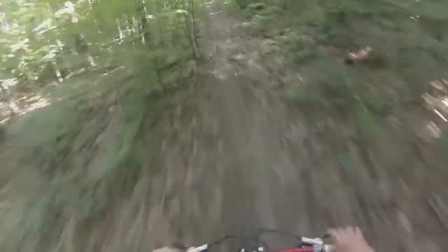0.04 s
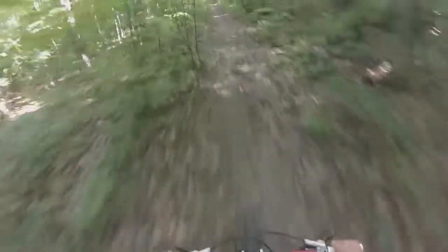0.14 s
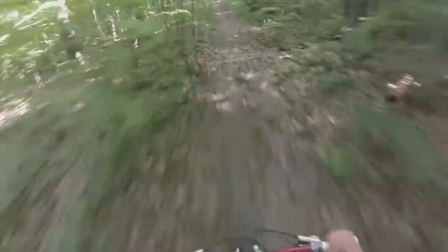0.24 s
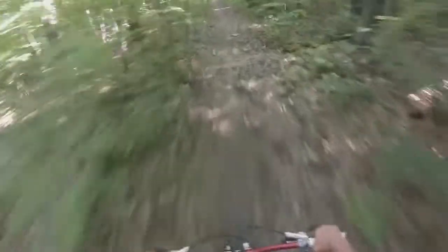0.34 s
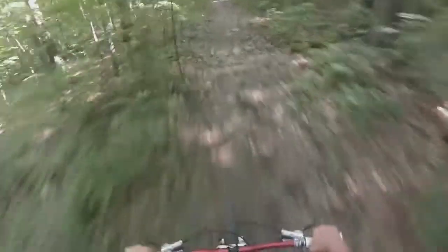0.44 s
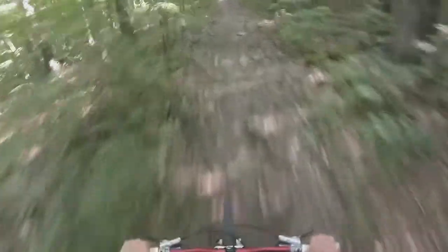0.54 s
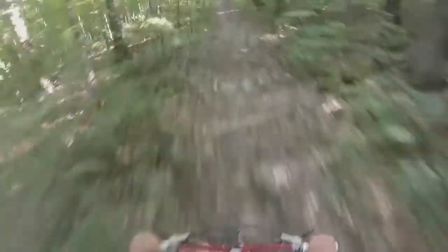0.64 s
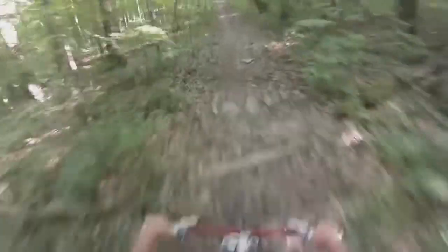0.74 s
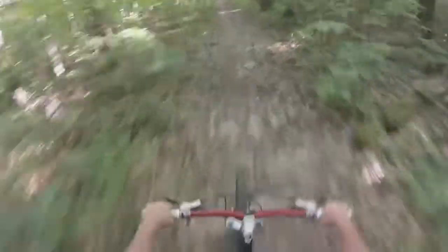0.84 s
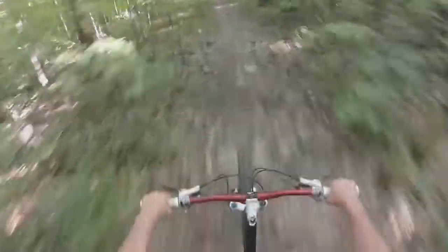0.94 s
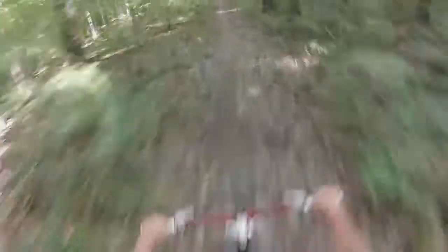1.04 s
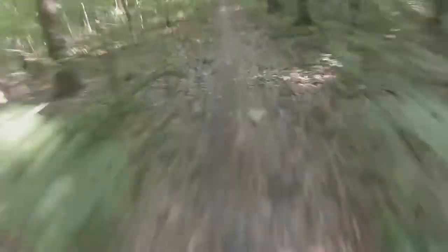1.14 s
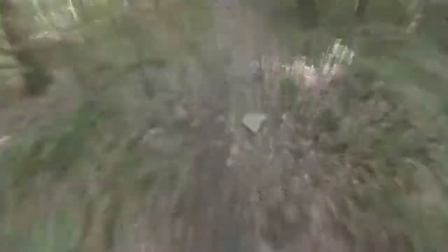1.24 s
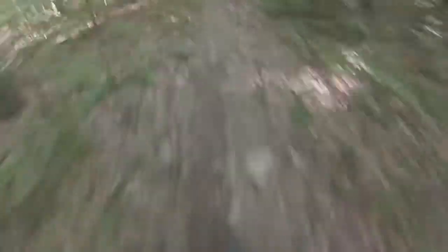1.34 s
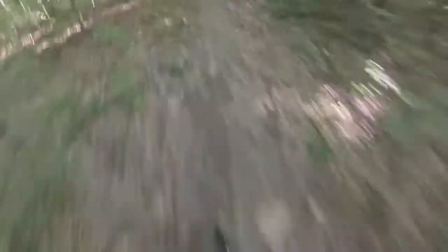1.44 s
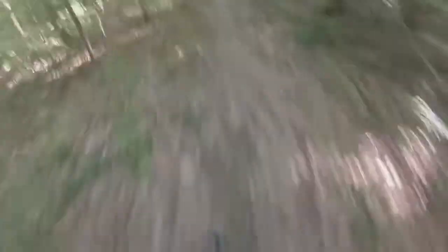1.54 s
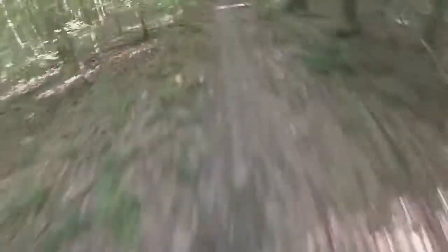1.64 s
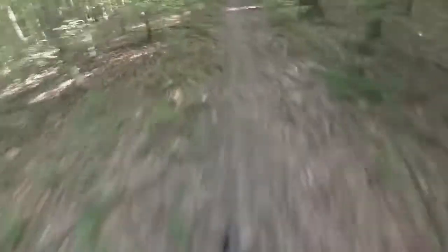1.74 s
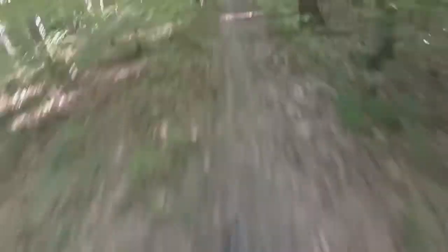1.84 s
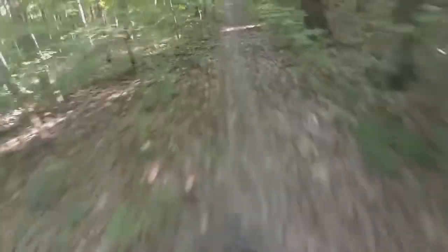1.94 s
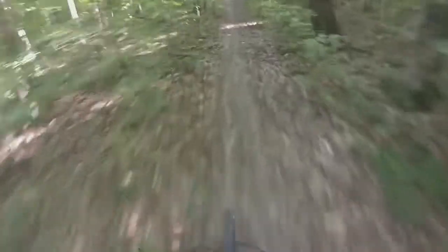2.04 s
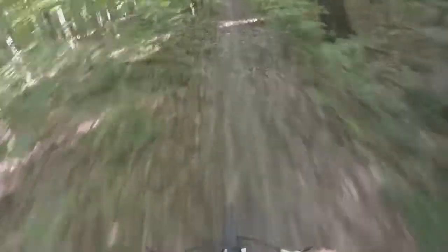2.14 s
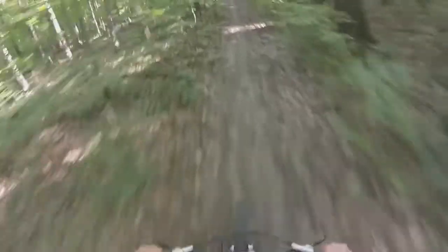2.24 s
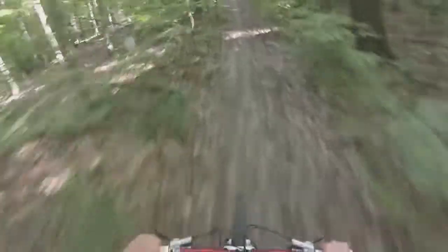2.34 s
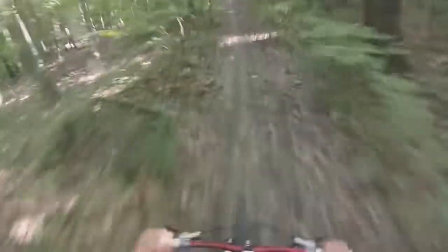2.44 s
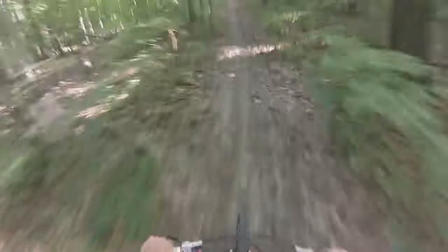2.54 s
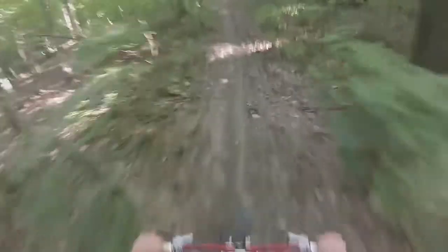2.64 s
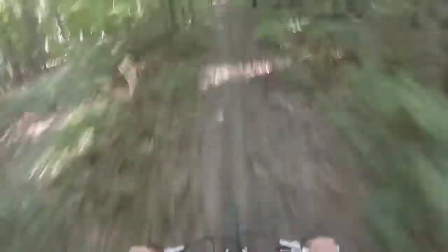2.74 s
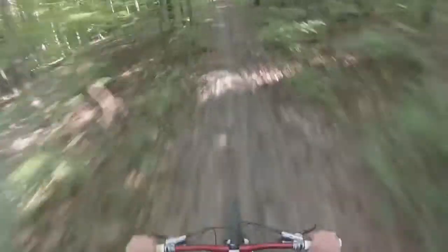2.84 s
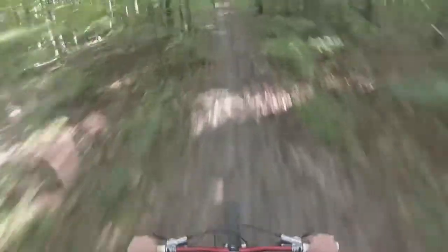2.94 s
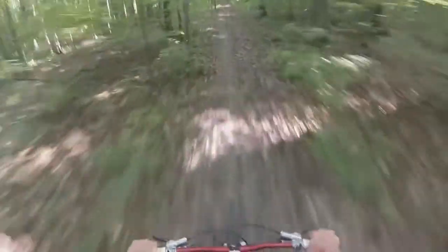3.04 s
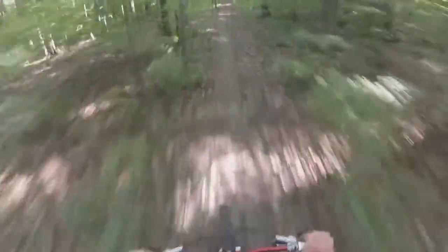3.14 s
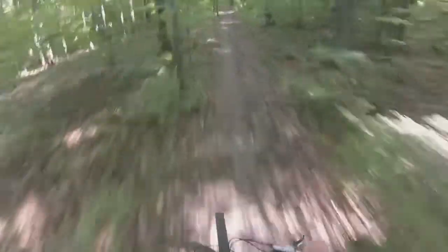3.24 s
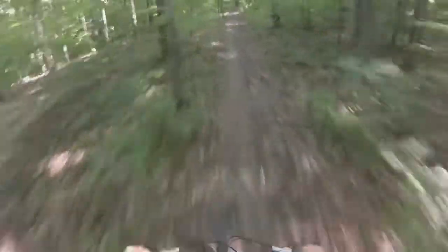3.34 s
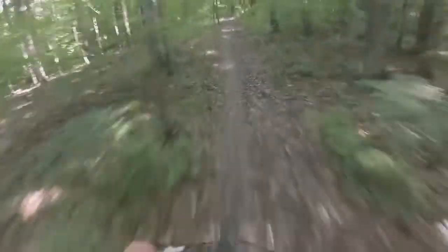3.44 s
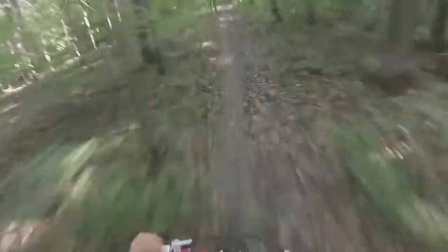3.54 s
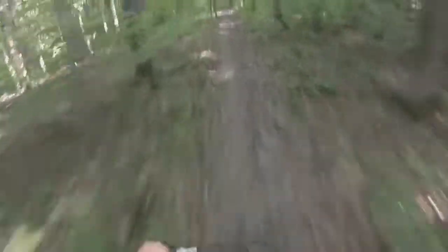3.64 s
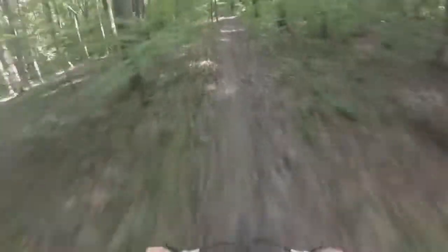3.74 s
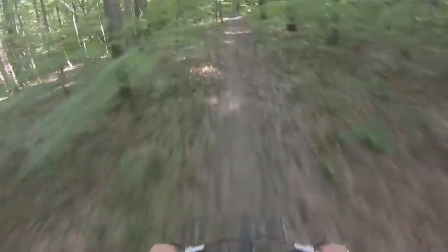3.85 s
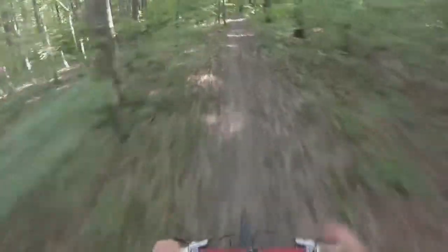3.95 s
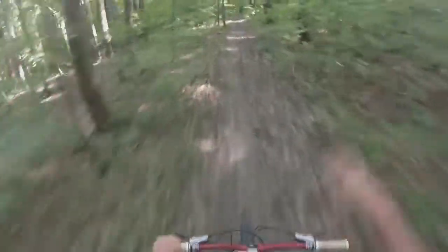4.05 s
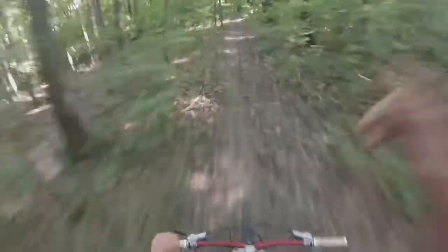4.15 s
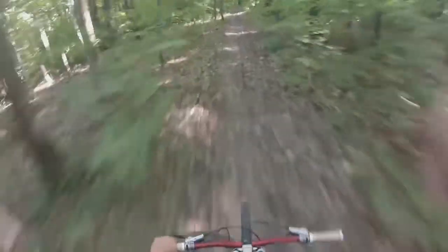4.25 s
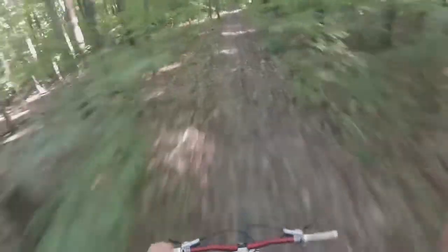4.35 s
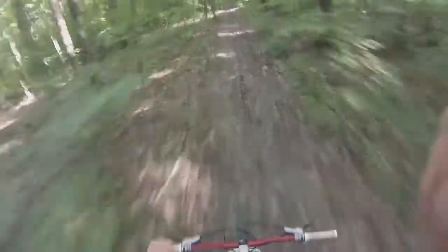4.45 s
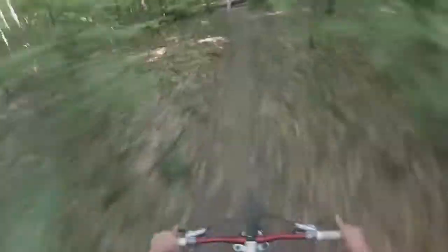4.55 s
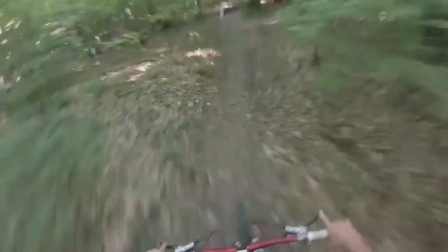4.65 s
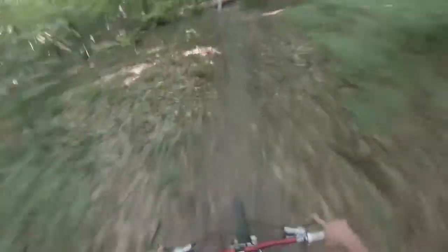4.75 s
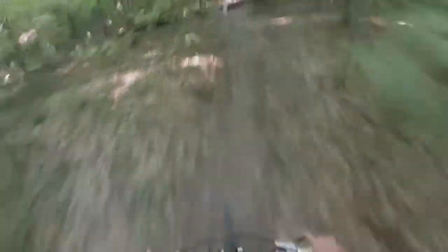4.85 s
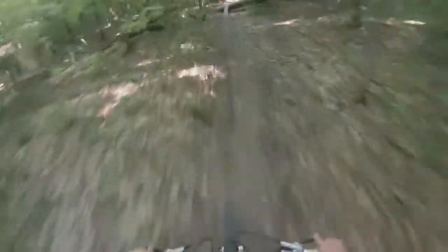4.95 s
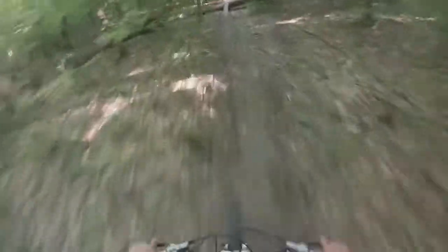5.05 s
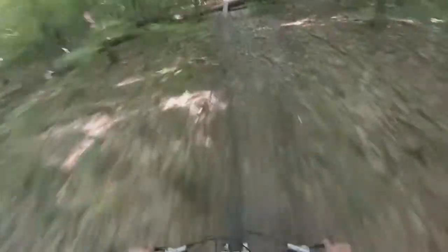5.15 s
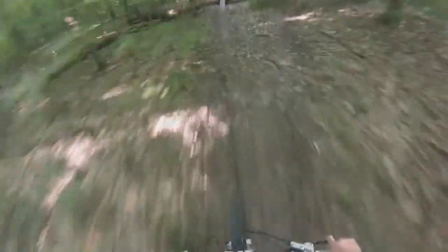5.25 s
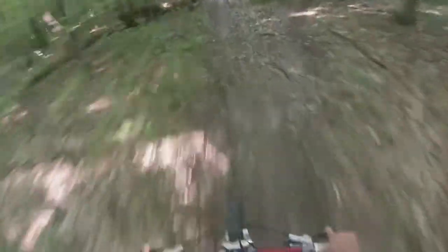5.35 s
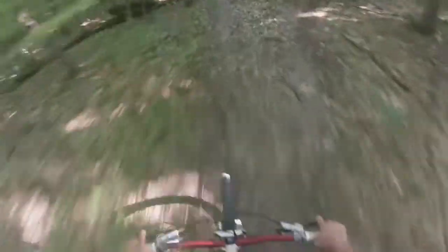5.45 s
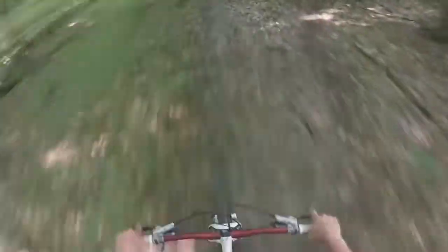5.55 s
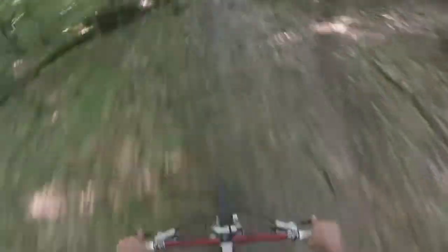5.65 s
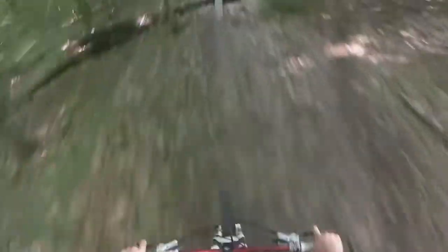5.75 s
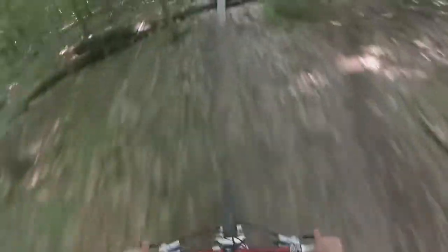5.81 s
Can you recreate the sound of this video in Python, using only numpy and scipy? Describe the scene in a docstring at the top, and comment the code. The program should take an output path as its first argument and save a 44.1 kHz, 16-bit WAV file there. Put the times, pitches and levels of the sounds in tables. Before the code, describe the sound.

A mountain bike speeds along a dirt trail in woods, picked up in mono by a camera shut in a plastic case on the helmet. Uneven, very low rumble runs throughout, with a dull helmet hum, faint gritty tyre noise and barely audible hiss. The first second is quiet apart from slight brushing. From 1.2 to 1.65 s the rumble swells and a dense rattle of hollow plastic knocks and bassy jolts breaks out, hardest near 1.29 and 1.38. It settles; soft low thumps and light scrapes come at 2.5 to 2.8, with weak bumps around 3.5 to 3.9. Sharp twig slaps, bright and clacky with heavy thuds, hit at 4.34, 4.43 and 4.49; sound drops out completely for about 0.03 s at 4.53. Small scrapes and low wobbles follow until 4.9. Quieter rolling leads to a quick cluster of lighter slaps and ticks at 5.55 to 5.75, then faint rumble.

```python
"""A low rumble and gritty tyre noise run throughout, broken by jolts, knocks, slaps, scrapes and a brief silence.
A mountain bike rolls fast down a dirt trail, heard by a camera shut in a plastic case on the rider's helmet.
Shaped noise makes the rumble, hum, tyre noise and hiss; bursts of noise ring the helmet, case and shell.
Short swings make the jolts, damped tones give knocks and slaps their pitch, and fading steps start some slaps.
One hard jolt cuts the sound for a moment, from one set time to another."""
import sys
import numpy as np
from scipy.fft import rfft, irfft, next_fast_len
from scipy.io import wavfile
from scipy.ndimage import uniform_filter1d, map_coordinates

SR = 44100
rng = np.random.default_rng(int(sys.argv[2]) if len(sys.argv) > 2 else 0)


def digitize_waveform(pressure):
    """Quantize a signal to 16-bit integers and store it at the path in sys.argv[1].

    Rows of a 2-D input are taken as channels; values are limited to [-1, 1].
    """
    field = np.atleast_2d(pressure).T
    bounded = np.clip(field, -1, 1)
    quanta = np.round(bounded * 32767).astype(np.int16)
    wavfile.write(sys.argv[1], SR, quanta)


N = 259308  # length in samples

# How loud the ride is over time.
# Each row: time in seconds, then mount rumble, helmet hum and tyre noise in dB.
RIDE_LEVELS = [(0.0, -45.5, -59.5, -62.5), (0.38, -48.5, -62.5, -66.5), (0.7, -43.5, -63.5, -67.5),
               (1.15, -37, -60.5, -66), (1.31, -35, -52, -51.5), (1.42, -32, -59.5, -60),
               (1.77, -44.5, -65, -68.5), (1.93, -44, -64, -66.5), (2.26, -46.5, -62, -66.5),
               (2.72, -38.5, -64.5, -63.5), (3.01, -46.5, -58, -65), (3.44, -39.5, -62, -65.5),
               (3.7, -42.5, -62, -66.5), (4.05, -43, -61.5, -66), (4.53, -37, -64, -64),
               (4.86, -43, -68.5, -69), (5.4, -48.5, -68.5, -74.5), (5.88, -47.5, -72, -74)]
# Tone of the wind and shaking in the mount. Each row: frequency in Hz, relative level in dB per Hz.
RUMBLE_TONE = [(7.1, -37), (12, 5), (27, -2.5), (49, -19.5), (90, -16), (187, -37.5), (264, -37.5),
               (330, -44), (430, -67), (730, -120)]
# Tone of the microphone noise. Each row: frequency in Hz, relative level in dB per Hz.
HISS_TONE = [(1650, -20), (2800, -3.5), (3300, -3.5), (5700, -3), (9100, -7), (12500, -6.5), (12900, -22),
             (16000, -35)]
# Low resonances of the helmet during the ride. Each row: centre in Hz, width in Hz, relative level in dB.
HELMET_HUM = [(244.6, 140, -10), (380, 34.5, 0.5), (403.56, 32, -2.5)]
# Resonances of the helmet when struck. Each row: centre in Hz, width in Hz, relative level in dB.
HELMET_THUD = [(168, 123, -6.5), (255, 79, 1), (348.7, 90, -1), (490, 120, -11.5), (770, 170, -11)]
# Resonances of the plastic case. Each row: centre in Hz, width in Hz, relative level in dB.
CASE_RESONANCES = [(939, 100, -6.5), (1269, 81, 1.6), (1510, 173, -0.67), (2010, 230, -2), (2356, 383, -7)]
# Thin parts of the case, heard when struck directly.
# Each row: centre in Hz, width in Hz, relative level in dB.
SHELL_RESONANCES = [(2990, 330, -5), (3500, 380, -4.5), (3920, 260, -2), (4480, 200, -7), (5010, 150, -3.5),
                    (5500, 390, -7), (5970, 450, -5.5), (6660, 400, -6.5), (7390, 570, -10.5),
                    (8800, 450, -11), (9180, 1200, -14), (10700, 1300, -13.5), (12300, 1800, -17),
                    (14374, 4900, -16.5)]
# Longer scrapes and brushes. Each row: start in seconds, case level in dB, shell against case in dB,
# case tilt in dB per octave, rise in seconds, time to fall 60 dB in seconds.
SCRAPES = [(0, -67, -17, 6.5, .009, 0.16), (0.919, -67.5, -9, -9.5, .007, .08),
           (1.121, -55.5, -25, 6, 0.053, 0.2), (1.24, -55, -24.5, 5, .02, 0.32),
           (1.335, -43.5, -24, 14, 0.024, 0.28), (1.405, -56, -19, 3, .015, 0.23),
           (1.712, -62.5, -9, 4, .008, .3), (2.56, -56.5, -16.5, 1.5, .014, 0.092),
           (2.698, -52, -18, 12.5, 0.025, 0.072), (3.91, -57.5, -24, 10, 0.055, 0.8),
           (4.344, -39, -4, 26, 0.0061, 0.2), (4.44, -61, 2.5, 3, .004, 0.1),
           (4.584, -61.5, -14.5, 13, .01, 0.11), (4.736, -62, -14.5, 13, 0.022, 0.12),
           (4.852, -63, -16, 7.5, 0.012, 0.15), (5.533, -65.5, -3.5, -0.5, 0.0078, 0.074)]
# The camera knocks inside its case over bumps. Each row: start in seconds, case level in dB,
# helmet against case in dB, shell against case in dB, case tilt in dB per octave, time to fall 60 dB in seconds.
KNOCKS = [(1.229, -33, 0.5, -36, 0.5, 0.023), (1.270, -43.5, -3.5, -31, 5, 0.057),
          (1.287, -42, 5.5, -16, -1, 0.022), (1.2925, -31, -6, -32, -24, 0.0347),
          (1.315, -38.5, 0, -19, 3.5, 0.0245), (1.373, -31.5, -1, -26, -3, 0.024),
          (1.3815, -24, -3, -21, 2.5, 0.015), (1.396, -33.5, -3.5, -29.5, -5, 0.051),
          (1.4295, -38, -3, -31, -14, 0.027), (1.573, -56, -3, -30.5, 14, 0.098),
          (1.592, -46.5, -0.5, -29, -6, 0.0546), (1.623, -45.5, -1.5, -27.5, -9.5, 0.053),
          (5.684, -60, -8.5, -6.5, -0.5, .015), (5.689, -54.5, -9.5, -29.5, 16.5, 0.02),
          (5.738, -61, -11, -30, 0, .05)]
# Twigs slap the outside. Each row: start in seconds, case level in dB, helmet against case in dB,
# shell against case in dB, case tilt in dB per octave, rise in seconds, time to fall 60 dB in seconds.
SLAPS = [(4.3384, -26, -8, -11, 1, 0.00047, 0.013), (4.4287, -25.5, -13.5, -3, 2, 0.0004, 0.026),
         (4.429, -30, -12, -5, 28, 0.0038, 0.0098), (4.488, -24.5, -7, -9.5, -9, 0.00051, 0.013),
         (4.515, -44.5, 4.5, -11, 10, 0.0059, 0.05), (5.576, -37, -2, -13.5, -8, 0.0073, 0.025),
         (5.585, -30, -11, -13, -4, 0.003, 0.0343), (5.596, -43.5, -2, -9, 5, 0.00246, 0.066),
         (5.629, -49, 0.5, -13.5, 6, 0.0033, 0.034), (5.64, -48.5, -10, -14, -1, 0.002, 0.1),
         (5.65, -33, -13, -12, 0, 0.00337, 0.016), (5.663, -34.5, -2, -7.5, -2, 0.0029, 0.028)]
# Short damped tones that give knocks and slaps their pitch, a few ringing on longer.
# Each row: start in seconds, level before the soft rise in dB, pitch in Hz, time to fall 60 dB in seconds.
PINGS = [(1.227, -26, 250, .04), (1.292, -25, 275, .04), (1.2935, -22, 1300, .028),
         (1.2868, -36, 5900, .008), (1.287, -48, 5080, .02), (1.3142, -38, 5950, .008),
         (1.315, -47, 5080, .022), (1.382, -3.5, 1525, .017), (1.382, -6, 1950, .015),
         (1.382, -10.5, 2390, .012), (4.429, -30, 925, .03), (4.4315, -21, 1470, .025),
         (4.4308, -13, 2335, .018), (4.431, -23, 3400, .012), (4.4305, -20, 3975, .018),
         (4.4305, -19, 5040, .018), (4.431, -26, 6080, .014), (4.4305, -28, 8600, .014),
         (4.431, -31, 9450, .014), (4.4308, -31, 10650, .013), (4.437, -66, 3570, .19),
         (4.437, -63, 5370, .2), (5.58, -48, 7228, .0117), (5.61, -49, 6100, .0114),
         (5.587, -36, 1490, .035), (5.6512, -32, 1265, .022), (5.6508, -26, 2150, .013),
         (5.6508, -31, 6450, .011), (5.6508, -33, 3750, .014), (5.651, -37, 4140, .016),
         (5.667, -67, 3560, .2)]
# Jolts of the mount. Each row: start in seconds, height of the swing's outline in dB,
# base swing rate in Hz, first direction (1 or -1).
JOLTS = [(1.234, -20.5, 85, -1), (1.247, -23, 45, -1), (1.276, -25.5, 69.8, 1), (1.2906, -16.5, 70, -1),
         (1.2983, -16, 54.7, 1), (1.316, -26, 94.9, 1), (1.338, -34, 100, 1), (1.355, -28.5, 110, 1),
         (1.369, -27, 60.3, 1), (1.394, -23, 91.3, 1), (1.425, -28, 62, 1), (1.44, -28, 27.7, 1),
         (1.477, -38.5, 50, 1), (1.529, -33, 81, -1), (1.558, -37.5, 110, 1), (1.59, -33, 117, -1),
         (1.612, -36.5, 120.5, 1), (2.473, -34.5, 28.6, 1), (2.57, -30.5, 60.6, -1), (2.579, -27, 74.2, 1),
         (2.594, -30, 47.4, 1), (2.65, -28, 36.7, 1), (2.685, -27, 44.3, -1), (2.711, -25, 40.5, 1),
         (2.729, -23.5, 62.3, -1), (2.816, -30.5, 50.6, -1), (3.493, -41, 44.6, 1), (3.747, -34, 44.95, -1),
         (3.868, -35.5, 44, 1), (4.342, -21.5, 88, -1), (4.355, -20.5, 87.8, -1), (4.428, -22, 85.5, -1),
         (4.4874, -15, 54.64, -1), (4.5238, -15, 106.2, 1), (4.553, -33.5, 37.2, 1), (4.735, -26.5, 26, 1),
         (4.798, -30, 23.53, 1), (5.583, -29, 89, -1), (5.598, -34, 95, 1), (5.65, -29, 99, 1),
         (5.663, -41, 65.2, 1)]
# Some slaps start with a sudden step of pressure.
# Each row: start in seconds, level before the rise in dB, direction (1 or -1).
PUSHES = [(4.3399, -18.5, 1), (4.4888, -21.5, -1), (5.651, -28.5, 1)]

SCRAPE_HELMET_DB = -7.5  # against the case level
SCRAPE_SHELL_TILT, KNOCK_SHELL_TILT, SLAP_SHELL_TILT = -2.5, -7, -4  # dB per octave
KNOCK_LOW_HZ, SLAP_LOW_HZ = 1230, 698  # the case rings little below this, struck from inside or outside
KNOCK_RISE_S = 0.001686
KNOCK_BLOW_DB, SLAP_BLOW_DB = 14, 9.5  # the one hard touch at the height of the burst, over its noise
CASE_TILT_HZ = 1520  # the case tilt starts here
PING_RISE_S = 0.001
SWING_PEAK = 0.48  # cycles at the base rate until a jolt's outline is widest
PUSH_RISE_S, PUSH_T60_S = 0.00018, 0.0157
DROPOUT_START_S, DROPOUT_END_S = 4.52712, 4.56163
TOP_HZ = 16800  # nothing is kept from here up


def amp(db):
    """Turn dB into a plain multiplier."""
    return 10 ** (np.asarray(db) / 20)


def unit(x):
    """Scale a sound to an average (rms) strength of 1."""
    return x / np.sqrt(np.mean(x ** 2) + 1e-20)


def filtered(x, response):
    """Shape a sound by a response that depends on frequency; zero padding leaves room for its tail."""
    size = 2 * next_fast_len(len(x) // 2 + 4096)
    spectrum = rfft(x, size) * response(np.fft.rfftfreq(size, 1 / SR))
    return irfft(spectrum, size)[:len(x)]


def sloped(points):
    """Make a gain curve by joining (Hz, dB) points along a log frequency axis."""
    f, db = np.transpose(points)
    return lambda hz: amp(np.interp(np.log(hz + 1), np.log(f + 1), db))


def modes(table):
    """Add up resonances, each strongest at its centre, with every second one upside down."""
    def response(hz):
        total = 0
        for k, (centre, width, db) in enumerate(table):
            damping = 1j * hz * width
            total = total + (-1) ** k * amp(db) * damping / (centre * centre - hz * hz + damping)
        return total
    return response


def causal(gain):
    """Give a gain curve its minimum-phase response, so that nothing sounds before a blow."""
    def response(hz):
        cepstrum = irfft(np.log(np.abs(gain(hz)) + 1e-6))
        # fold the backward-in-time half onto the forward half
        cepstrum[1:len(hz) - 1] *= 2
        cepstrum[len(hz):] = 0
        return np.exp(rfft(cepstrum))
    return response


def tilt(hz, db_per_octave, low, high):
    """Rise or fall steadily between two frequencies, staying level outside them."""
    return amp(db_per_octave * np.log2(np.clip(hz, low, high) / low))


def wobble(rate):
    """Draw a smooth random curve through this many random points a second."""
    points = rng.standard_normal(int(N * rate / SR) + 4)
    return map_coordinates(points, [np.arange(N) * rate / SR])


def add_at(out, start_s, sound):
    """Mix a short sound into a longer one."""
    out[round(start_s * SR):][:len(sound)] += sound


def rolling():
    """Riding shakes the mount into lumpy rumble, hums in the helmet and sends tyre grit through the case."""
    times, *columns = np.transpose(RIDE_LEVELS)
    rumble_db, hum_db, tyre_db = [np.interp(np.arange(N) / SR, times, c) for c in columns]
    shake = wobble(9.1)  # small bumps move all layers together

    # about 40 single pushes a second from the trail
    bumps = 18 * (rng.random(N) < 40 / SR) * rng.laplace(size=N)
    rumble = amp(2 * shake) * (rng.standard_normal(N) + bumps)
    rumble = filtered(rumble, sloped(RUMBLE_TONE))

    def helmet(hz):
        # adding the two groups this way leaves a dip between their bands
        bands = modes(HELMET_HUM[:1])(hz) + modes(HELMET_HUM[1:])(hz)
        return bands / (1 + (hz / 480) ** 5)

    hum = filtered(amp(2.1 * shake) * rng.standard_normal(N), helmet)

    def case(hz):
        # a little passes between and above the resonances
        leak = amp(-17) / (1 + (hz / 3000) ** 2)
        return modes(CASE_RESONANCES)(hz) / (1 + (hz / 2700) ** 8) + leak

    grit_db = 0.35 * shake + 1.7 * wobble(40) + 0.73 * wobble(300)
    tyre = filtered(amp(grit_db) * rng.standard_normal(N), case)
    return amp(rumble_db) * unit(rumble) + amp(hum_db) * unit(hum) + amp(tyre_db) * unit(tyre)


def scrapes():
    """Longer brushes are swelling, dying noise without a single hard touch."""
    out = np.zeros(N + SR)
    for s, case_db, shell_db, case_tilt, rise, t60 in SCRAPES:
        ring = struck(case_db, SCRAPE_HELMET_DB, shell_db, case_tilt, SCRAPE_SHELL_TILT,
                      rise, t60, SLAP_LOW_HZ, -np.inf)
        add_at(out, s, ring)
    return out[:N]


def struck(case_db, helmet_db, shell_db, case_tilt, shell_tilt, rise, t60, low_hz, blow_db):
    """A burst of contact noise, swelling then dying, rings the helmet, the case and its thin shell."""
    t = np.arange(SR // 3) / SR
    shape = np.where(t < rise, t / rise, amp(-60 * (t - rise) / t60))
    burst = shape * rng.standard_normal(len(t))
    burst[round(rise * SR)] += amp(blow_db)

    # each blow lands elsewhere, so the levels (last column) of the shell's parts vary
    level_change = rng.normal(0, 2.2, (len(SHELL_RESONANCES), 1))  # dB
    spot = SHELL_RESONANCES + level_change * np.array([0, 0, 1])

    def helmet(hz):
        return modes(HELMET_THUD)(hz) / (1 + (hz / 900) ** 4)

    def case(hz):
        top = amp(-9.5) / (1 + (hz / 3900) ** 6) + 1 / (1 + (hz / 2600) ** 12)
        bottom = 1 / (1 + (low_hz / (hz + 1)) ** 6.04)
        return modes(CASE_RESONANCES)(hz) * top * bottom * tilt(hz, case_tilt, CASE_TILT_HZ, 2400)

    def shell(hz):
        return modes(spot)(hz) / (1 + (hz / 14500) ** 16) * tilt(hz, shell_tilt, 4200, 16000)

    out = np.zeros(len(t))
    parts = ((case_db + helmet_db, helmet), (case_db, case), (case_db + shell_db, shell))
    for db, response in parts:
        ring = filtered(burst, causal(response))
        # give each part the energy of the burst's outline, then its own level
        out += amp(db) * ring * np.linalg.norm(shape) / np.linalg.norm(ring)
    return out


def pings():
    """Short damped tones, their phase drifting a little, give knocks and slaps their pitch."""
    out, t = np.zeros(N + SR), np.arange(SR // 4) / SR
    for s, db, hz, t60 in PINGS:
        drift = uniform_filter1d(rng.standard_normal(len(t)), size=60)
        waver = np.cumsum(drift) * np.sqrt(100 / SR)
        shape = amp(db - 60 * t / t60) * (1 - np.exp(-t / PING_RISE_S)) ** 2
        add_at(out, s, shape * np.sin(2 * np.pi * hz * t + waver))
    return out[:N]


def knocks():
    """The camera hits its case from inside: a quick burst of noise with one hard touch."""
    out = np.zeros(N + SR)
    for s, case_db, helmet_db, shell_db, case_tilt, t60 in KNOCKS:
        ring = struck(case_db, helmet_db, shell_db, case_tilt, KNOCK_SHELL_TILT,
                      KNOCK_RISE_S, t60, KNOCK_LOW_HZ, KNOCK_BLOW_DB)
        add_at(out, s, ring)
    return out[:N]


def jolts():
    """Each jolt swings the mount for a few cycles, fastest at first while the strap is tight."""
    out, t = np.zeros(N + SR), np.arange(SR // 4) / SR
    for s, db, hz, direction in JOLTS:
        rise = SWING_PEAK / hz
        # the rate slides from 1.092 down to 0.852 times the base rate
        cycles = hz * (0.852 * t + 0.24 * rise * (1 - np.exp(-t / rise)))
        shape = amp(db) * t / rise * np.exp(1 - t / rise)
        add_at(out, s, direction * shape * np.sin(2 * np.pi * cycles))
    return out[:N]


def slaps():
    """Twigs hit the outside: noise with one hard touch, ringing the case lower than a knock does."""
    out = np.zeros(N + SR)
    for s, case_db, helmet_db, shell_db, case_tilt, rise, t60 in SLAPS:
        ring = struck(case_db, helmet_db, shell_db, case_tilt, SLAP_SHELL_TILT,
                      rise, t60, SLAP_LOW_HZ, SLAP_BLOW_DB)
        add_at(out, s, ring)
    return out[:N]


def pushes():
    """Some slaps start with a sudden step of pressure that leaks away."""
    out, t = np.zeros(N + SR), np.arange(SR // 10) / SR
    for s, db, direction in PUSHES:
        leak = amp(db - 60 * t / PUSH_T60_S)
        add_at(out, s, direction * leak * (1 - np.exp(-t / PUSH_RISE_S)))
    return out[:N]


def scene():
    """Mix all sources into one channel."""
    contacts = scrapes() + knocks() + slaps()
    return (rolling() + contacts + pings() + jolts() + pushes())[None]


def record(dry):
    """Add steady microphone hiss, silence the short dropout and remove the highest treble."""
    hiss = filtered(rng.standard_normal(N), sloped(HISS_TONE))
    x = dry[0] + amp(-85.5) * unit(hiss)
    x[round(DROPOUT_START_S * SR):round(DROPOUT_END_S * SR)] = 0
    return filtered(x, lambda hz: hz < TOP_HZ)[None]


dry = scene()
out = record(dry)
digitize_waveform(out)
```